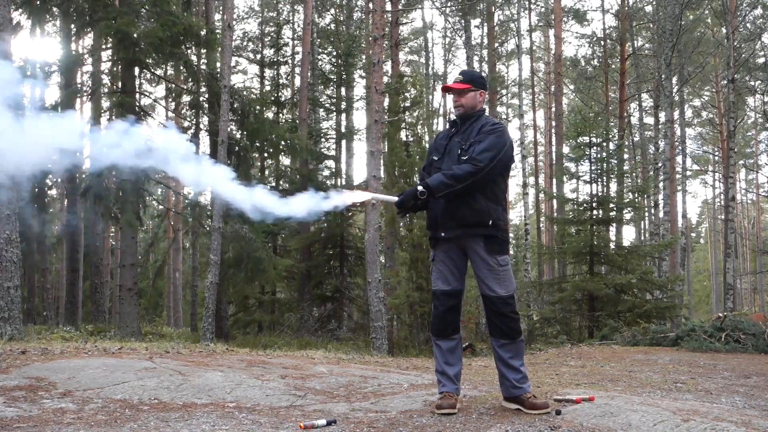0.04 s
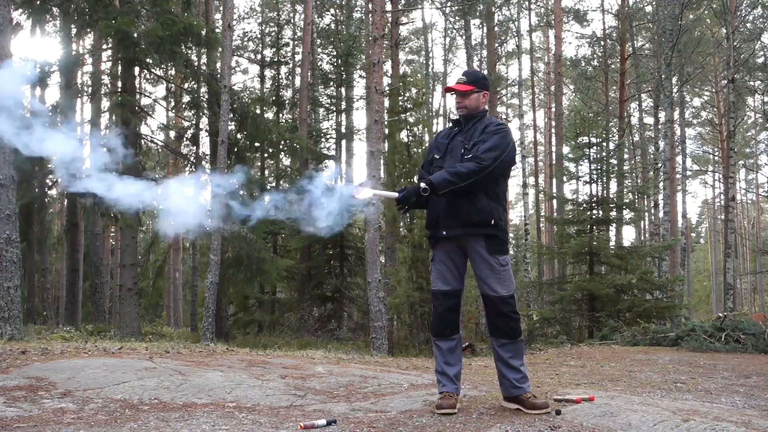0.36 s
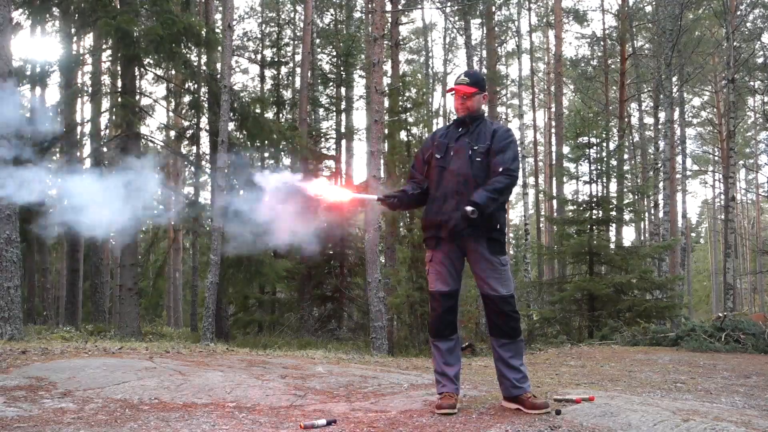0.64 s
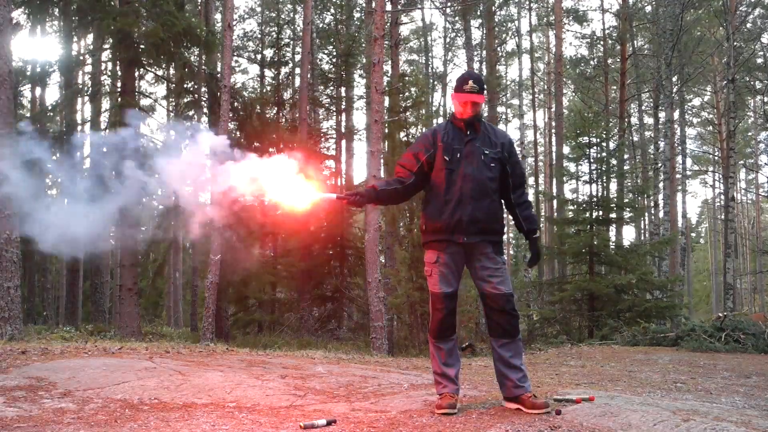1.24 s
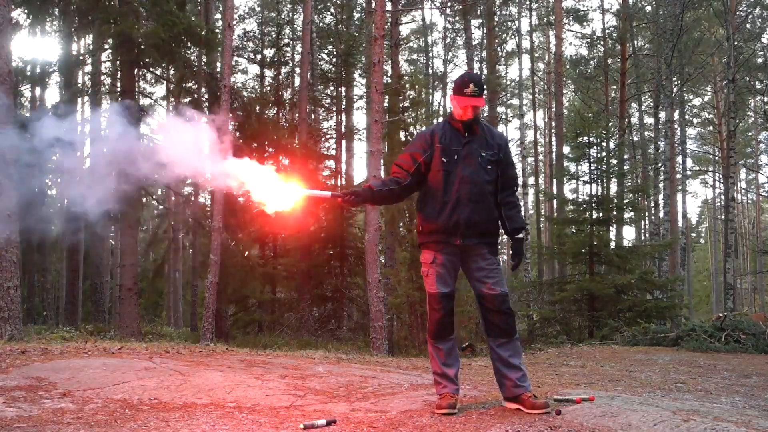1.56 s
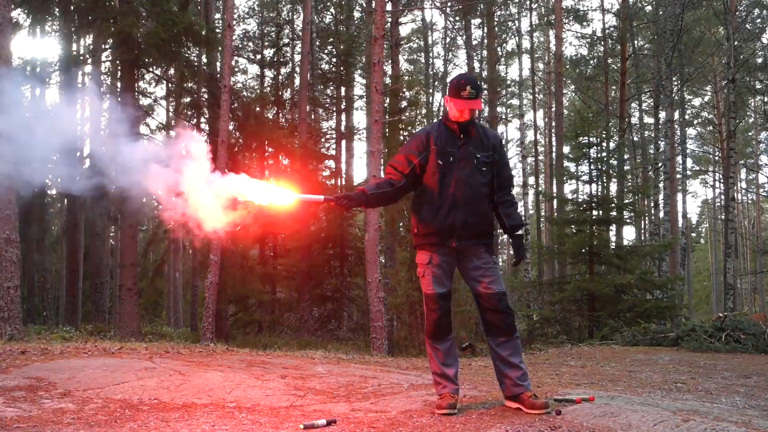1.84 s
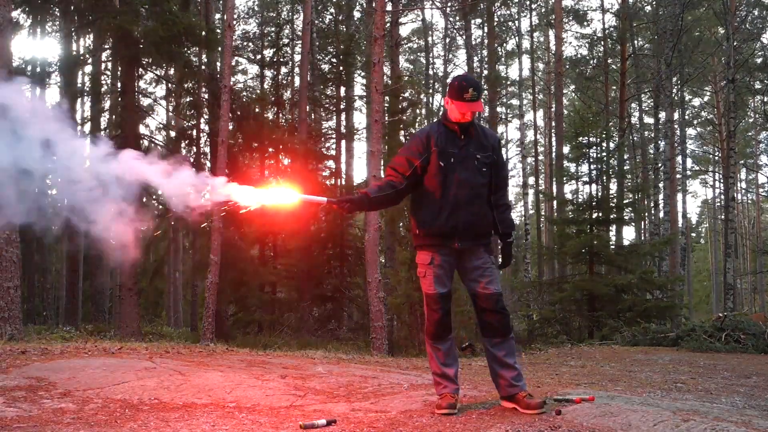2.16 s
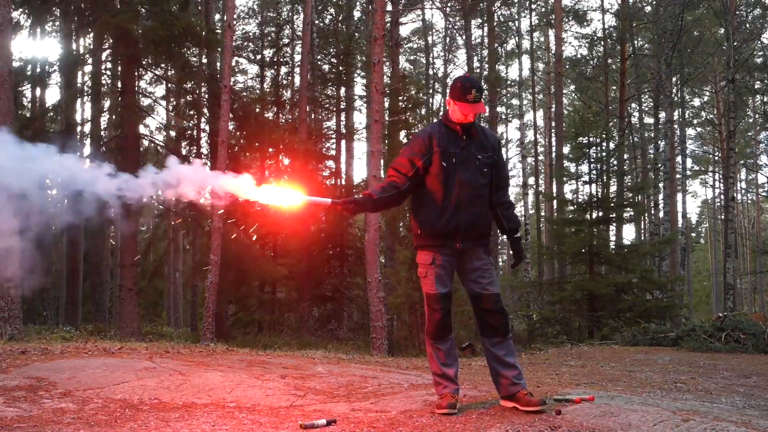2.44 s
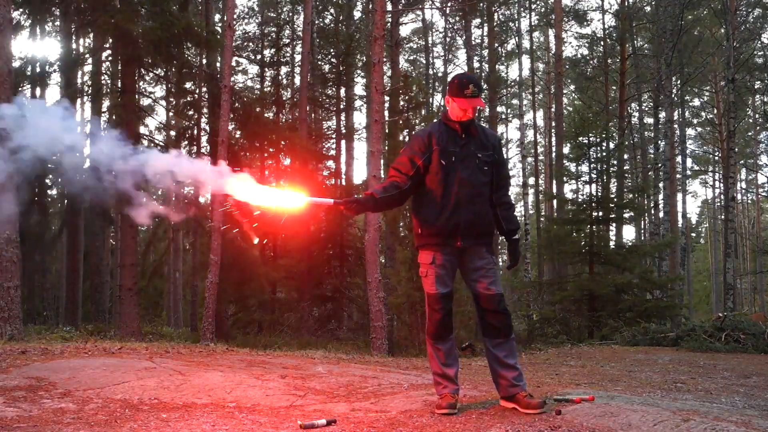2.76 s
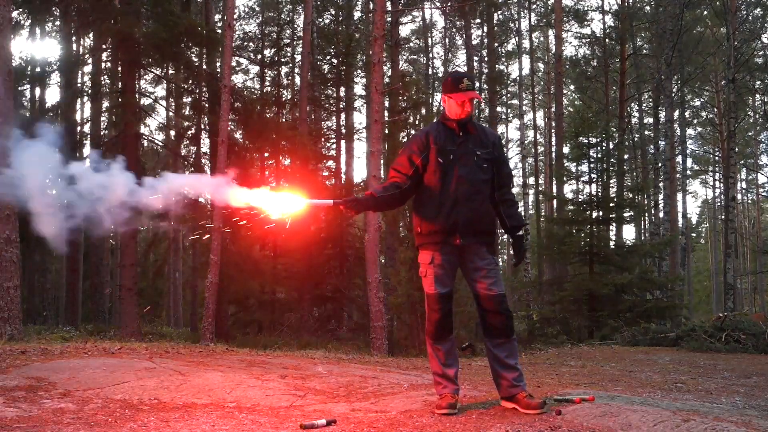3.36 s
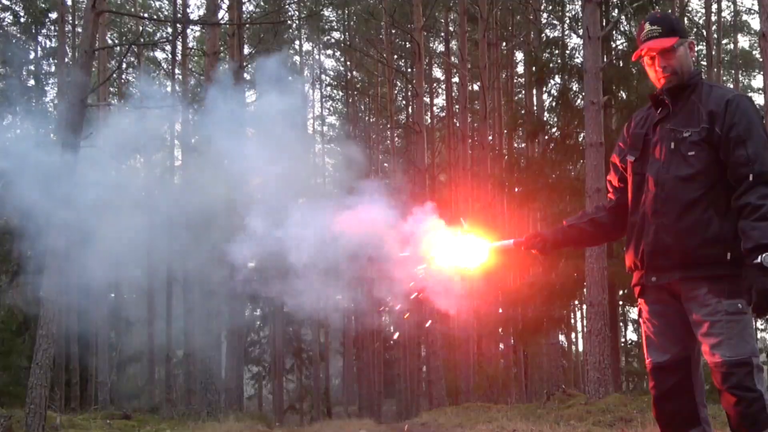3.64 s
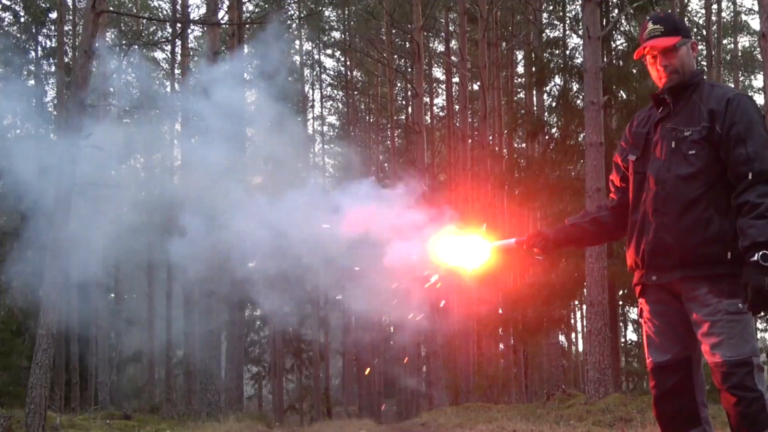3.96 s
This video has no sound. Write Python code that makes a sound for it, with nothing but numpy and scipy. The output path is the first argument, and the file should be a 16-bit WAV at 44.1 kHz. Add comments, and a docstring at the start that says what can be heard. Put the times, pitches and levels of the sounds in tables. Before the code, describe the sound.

The hiss of a burning hand flare builds from soft to a bright, sizzling rush, dotted with snaps and ticking sparks. Wind buffets the microphone throughout, and trees rustle faintly around the clearing.

```python
"""A forest clearing, where a hand flare catches and burns a few metres away.
Its gas jet hisses, roars and whistles once; slag sizzles and pops in it and sparks tick out.
The echo off the ground combs the hiss as the arm sinks. The trees scatter the sound and rustle
softly, while gusts of wind rumble, flap and slap on both microphone ports."""
import sys
import numpy as np
from scipy import signal
from scipy.fft import rfft, irfft, next_fast_len
from scipy.io import wavfile
from scipy.ndimage import map_coordinates

SR = 44100
rng = np.random.default_rng(int(sys.argv[2]) if len(sys.argv) > 2 else 0)


def int16_out(signal):
    """Quantize to a 16-bit WAV file."""
    q = np.round(np.clip(np.atleast_2d(signal).T, -1, 1) * 32767)
    wavfile.write(sys.argv[1], SR, q.astype(np.int16))


N = 176400
TIME_S = np.arange(N) / SR
SIDES = np.array([[1], [-1]])  # left, right


def amp(db):
    """Decibels to gain."""
    return 10 ** (np.asarray(db) / 20)

def unit(x):
    """Scaled to rms 1."""
    return x / np.sqrt(np.mean(x ** 2) + 1e-20)

def bell(offset, width):
    """A Gaussian bump, 1 at zero offset."""
    return np.exp(-.5 * (offset / width) ** 2)

def curve(rows):
    """An automation lane: (time_s, value) rows as one value per sample."""
    return np.interp(TIME_S, *np.transpose(rows))

def wobble(rate_hz):
    """A smooth random curve through rate_hz knots a second."""
    return map_coordinates(rng.standard_normal(4096), [TIME_S * rate_hz], mode="wrap")

def filtered(x, response):
    """x through a frequency response."""
    size = next_fast_len(N + SR // 2)
    return irfft(rfft(x, size) * response(np.fft.rfftfreq(size, 1 / SR)), size)[..., :N]

def coloured(x, eq):
    """x through an EQ of (freq_hz, gain_db) rows."""
    freq_hz, gain_db = np.transpose(eq)
    return filtered(x, lambda hz: amp(np.interp(np.log(hz + 1), np.log(freq_hz), gain_db)))

def grains(per_s, spread_db):
    """Random impulses of scattered size, rms 1."""
    size = amp(spread_db * np.clip(rng.standard_normal(N), -2, 2)) * np.sign(rng.standard_normal(N))
    return unit(size * (rng.random(N) < per_s / SR))


# Soft midrange of the rustle: freq_hz, gain_db
RUSTLE_EQ = [(100, -18), (400, -2.5), (800, 3.5), (1200, 3), (1800, -5.5), (3000, -17), (8000, -23),
             (16000, -22)]

def trees(level_db=-49.5, side_db=-6):
    """The trees rustle all around, a quiet and even bed."""
    mid, side = unit(coloured(rng.standard_normal((2, N)), RUSTLE_EQ)) * amp([[0], [side_db]])
    return amp(level_db) * (mid + SIDES * side)


# Swell and fall of the gusts: time_s, level_db
GUSTS = [(0, -32), (.15, -33), (.29, -28), (.36, -34.5), (.47, -36.5), (.57, -28.5), (.68, -33.5),
         (1, -32.5), (1.11, -28), (1.2, -34), (1.35, -35.5), (1.46, -32), (1.75, -34), (1.92, -42),
         (1.98, -23.5), (2.18, -24), (2.29, -20.5), (2.54, -26.5), (2.58, -35.5), (2.94, -37),
         (3.08, -26.5), (3.37, -28), (3.7, -32), (3.76, -35.5), (3.88, -35), (4, -56)]
# The port that the rumble leans to: time_s, left_minus_right_db
RUMBLE_PAN = [(0, -4), (.6, -3), (.9, 7.5), (1.15, -2), (1.5, 4), (1.9, -0.5), (2.4, -1.5), (2.55, 1.5),
              (3.05, 2), (3.3, -9), (3.6, -0.5), (4, -5)]
# Deep body of the wind: freq_hz, gain_db
RUMBLE_EQ = [(10, -17.5), (28, -1), (60, 2), (100, -4), (160, -9.5), (250, -21.5), (400, -41), (1000, -78)]
# Low-mid flutter of the wind: freq_hz, gain_db
FLAP_EQ = [(60, -28), (140, -1.5), (230, -1.5), (330, -5.5), (480, -16), (800, -27.5), (2000, -58)]

def wind(shared=.21, breeze_db=-31.5, flap_growth=1.54, flap_pan_db=-4.5):
    """Each port has mostly its own turbulence: a rumble, and flapping that grows faster in a gust."""
    def turbulence(eq, lump_db, rate_hz):
        common = np.sqrt(shared) * rng.standard_normal(N)
        own = np.sqrt(1 - shared) * rng.standard_normal((2, N))
        lumps = amp(lump_db * np.array([wobble(rate_hz), wobble(rate_hz)]))
        return unit(coloured(common + own, eq) * lumps)

    gust_db = curve(GUSTS)
    rumble_db = gust_db + SIDES * curve(RUMBLE_PAN) / 2
    flap_db = -44.5 + flap_growth * (gust_db - breeze_db) + SIDES * flap_pan_db / 2
    rumble = turbulence(RUMBLE_EQ, lump_db=3, rate_hz=21.77) * amp(rumble_db)
    flap = turbulence(FLAP_EQ, lump_db=4.5, rate_hz=40) * amp(flap_db)
    return rumble + flap


# Low slaps of air: peak_s, level_db, centre_hz, width_s, left_minus_right_db
EDDIES = [(0.252, -33.5, 184, 0.02, -3), (0.734, -33, 221, 0.0057, -9.5), (1.118, -29.5, 75, .02, 11),
          (1.438, -31.5, 213, 0.018, -6.5), (2.27, -21, 97.5, 0.011, -16), (2.292, -22.5, 263, 0.012, -3),
          (2.395, -27.5, 266, 0.0069, -9), (2.478, -20, 260, 0.0084, -17.5), (2.5, -28, 203, 0.0073, 1),
          (3.084, -28.5, 290, .014, -8), (3.15, -30.5, 219, 0.0042, -9.5), (3.175, -26, 49.7, 0.0093, -19),
          (3.225, -29, 180, .007, -13), (3.279, -29, 131, 0.0095, -11), (3.602, -28.5, 205, 0.0065, -9),
          (3.683, -31.5, 196, 0.0078, -2)]

def eddies(width_oct=.56):
    """Single eddies slap the ports, most of them harder on one side."""
    out = np.zeros((2, N))
    for peak_s, level_db, centre_hz, width_s, pan_db in EDDIES:
        swell = bell(TIME_S - peak_s, width_s)
        band = lambda hz: bell(np.log2((hz + 1) / centre_hz), width_oct)
        slap = filtered(rng.standard_normal((2, N)), band) * swell
        slap *= np.linalg.norm(swell) / np.linalg.norm(slap, axis=1, keepdims=True)
        out += slap * amp(level_db + SIDES * pan_db / 2)
    return out


# Tone of the scatter off the trunks: freq_hz, gain_db
SCATTER_EQ = [(300, -7.5), (1200, -25.5), (2300, -8), (4000, -4), (8000, -7), (12000, -4.5), (15000, -2)]

def trunks(x, t60_s=.25, blocks=32):
    """The trunks return a diffuse tail that keeps changing as flame and air move."""
    decay = amp(-60 * TIME_S[:SR // 3] / t60_s)
    send = coloured(x, SCATTER_EQ)
    edges = np.linspace(0, N, blocks + 1).astype(int)
    out = np.zeros((2, N + SR))
    for start, end in zip(edges, edges[1:]):
        tail = rng.standard_normal((2, len(decay))) * decay  # a fresh tail for each block
        wet = signal.fftconvolve(send[None, start:end], tail / np.linalg.norm(tail[0]), axes=1)
        out[:, start:start + wet.shape[1]] += wet
    return out[:, :N]


# Lag of the ground echo, shorter as the flare is lowered: time_s, delay_ms
ECHO_DELAY = [(0, 1.42), (.35, 1.5), (.7, 1.45), (1, 1.4), (1.3, 1.37), (1.65, 1.385), (2.05, 1.32),
              (2.6, 1.345), (3.2, 1.295), (4, 1.295)]
# Tone of the ground bounce: freq_hz, gain_db
GROUND_EQ = [(300, -4.5), (1500, -3.5), (3500, -11.5), (6000, -10.5), (9000, -19), (15000, -12)]

def clearing(x, port_lag_ms=.015, lean_left_db=.5):
    """Direct sound and ground echo reach the left port first; the trunks answer from all sides."""
    delay_samples = curve(ECHO_DELAY) * SR / 1000
    echo = map_coordinates(coloured(x, GROUND_EQ), [np.arange(N) - delay_samples])
    lead_s = SIDES * port_lag_ms / 1000 / 2
    near = filtered(x + echo, lambda hz: np.exp(2j * np.pi * hz * lead_s))
    return (near + trunks(x)) * amp(lean_left_db * SIDES)


# Bright tick of a spark: freq_hz, gain_db
SPARK_EQ = [(1000, -14), (4000, -3), (8000, 0), (12000, -3), (16000, -9)]

def sparks(burn_db, trim_db=-13.5):
    """Flying sparks tick sparsely, louder as the burn grows."""
    ticks = unit(coloured(grains(per_s=60, spread_db=2.5), SPARK_EQ))
    return ticks * amp(burn_db + trim_db)


# Crisp snap of a bursting bead: freq_hz, gain_db
POP_EQ = [(300, -31), (1500, -4), (4000, 1), (7000, 5.5), (10000, 0), (13000, -6), (16000, -23.5)]
# Loud pops of slag, before the trim: start_s, peak_db
POPS = [(.518, -17), (.59, -23), (.605, -20.5), (.666, -22), (.695, -20.5), (.772, -20), (.815, -20),
        (.838, -15.5), (.877, -20), (.932, -21), (1.016, -16.5), (1.067, -15.5), (1.362, -18), (1.396, -18),
        (1.5, -16.5), (1.541, -15), (1.603, -12), (1.678, -22), (1.951, -17), (2.249, -15), (2.402, -20),
        (2.495, -18.5), (2.568, -16), (2.577, -12.5), (2.692, -16), (2.822, -16), (2.866, -13),
        (2.919, -15.5), (3.082, -14.5), (3.223, -18), (3.446, -15), (3.728, -13)]

def slag(burn_db, crackle_db=-9.5, clump_db=4.5, pop_trim_db=.5, splinter_db=-5, splinter_s=.003):
    """Beads of slag burst, each one sharp swing of pressure: spits of crackle and some loud pops."""
    snap = lambda x: -np.imag(signal.hilbert(coloured(x, POP_EQ)))
    clumps = amp(clump_db * np.clip(wobble(rate_hz=130), -2, 2))
    beads = clumps * np.abs(grains(per_s=1400, spread_db=6))
    crackle = unit(snap(beads)) * amp(burn_db + crackle_db)
    bursts = np.zeros(N)
    for start_s, peak_db in POPS:
        peak = amp(peak_db + pop_trim_db)
        bursts[round(start_s * SR)] += peak
        splinters_s = start_s + splinter_s * rng.uniform(-1.2, 1, size=5)
        bursts[np.round(splinters_s * SR).astype(int)] += peak * amp(splinter_db)
    snap_peak = snap(signal.unit_impulse(N, "mid")).max()
    return crackle + snap(bursts) / snap_peak


def whistle(peak_s=2.53, width_s=.022, pitch_hz=3650, width_hz=70, level_db=-41):
    """The gas catches a narrow resonance of the nozzle for a moment."""
    tone = unit(filtered(rng.standard_normal(N), lambda hz: bell(hz - pitch_hz, width_hz)))
    return amp(level_db) * tone * bell(TIME_S - peak_s, width_s)


def patchy(x, depth_db=.8, patch_hz=301, patch_s=.1):
    """The colour shifts in patches: a random gain drifts over frequency and time."""
    hz, t, spectrum = signal.stft(x, SR, nperseg=512)
    grid = np.meshgrid(hz / patch_hz, t / patch_s, indexing="ij")
    drift = map_coordinates(rng.standard_normal((128, 128)), grid, mode="wrap")
    return signal.istft(spectrum * amp(depth_db * drift), nperseg=512)[1][:N]


# The burn catches, then surges; fader for hiss, rush, slag crackle and sparks: time_s, level_db
BURN = [(0, -48.5), (.1, -45.5), (.19, -50), (.3, -45), (.45, -44), (.49, -40.5), (.56, -39.5),
        (.62, -37.5), (.98, -34.5), (1.06, -32), (1.17, -31), (1.25, -34), (1.35, -30), (1.46, -34),
        (1.6, -30.7), (1.7, -33), (2.02, -33), (2.47, -32.5), (2.56, -30.5), (2.64, -33), (2.76, -31),
        (3.1, -33), (3.2, -30), (3.67, -28.5), (3.89, -30.5), (4, -29.5)]
# Roar fader, rising as the flame widens: time_s, level_db
ROAR_FADER = [(0.0, -52.5), (0.18, -56.5), (0.42, -51.5), (0.65, -42), (1.69, -40), (1.7, -40.5),
              (2.04, -38.5), (3.97, -36.5), (4.0, -37)]
# Fader for the fine fizz on top: time_s, level_db
FIZZ_FADER = [(0, -65), (.2, -70), (.44, -69), (.6, -55), (.85, -46), (1.15, -55), (1.4, -44), (1.55, -52),
              (1.9, -49), (2.3, -48), (2.57, -41), (2.8, -45), (3.1, -40), (3.5, -40.5), (3.85, -39.5),
              (4, -37)]
# Tilt from rush to hiss, brightest while the flame first grows: time_s, tilt_db
BRIGHTNESS = [(0, 1), (.55, -0.5), (.95, 6), (1.9, 2.5), (2.3, 2.5), (2.8, -1), (3.3, 2), (4, 2)]
# Broad body of the roar: freq_hz, gain_db
ROAR_EQ = [(200, 3), (450, -1.5), (750, -4.5), (1100, 0.5), (1500, -1.5), (2300, 0), (3200, -2),
           (5000, -27.5), (10000, -43)]
# Upper-mid rush of gas: freq_hz, gain_db
RUSH_EQ = [(2000, -16.5), (3200, -5), (3750, 3), (4600, 3), (5400, 0.5), (6500, -2), (9000, -37)]
# Bright edge of the hiss: freq_hz, gain_db
HISS_EQ = [(1000, -14), (3500, -11), (5300, -4), (6500, 0), (7400, -1.5), (8600, -3.5), (10500, -13),
           (13000, -18), (16000, -30)]
# Airy top of the fizz: freq_hz, gain_db
FIZZ_EQ = [(3000, -22), (8000, 6), (10500, 2.5), (12000, -0.5), (14000, -7.5), (16000, -11)]

def jet(burn_db, sputter_db=.95, surge_db=-.18, sizzle_share=.48):
    """Rushing gas with dense sizzle in it: roar, rush, hiss and fizz sputter together."""
    def layer(eq, fader_db, trim_db):
        gas = np.sqrt(1 - sizzle_share) * rng.standard_normal(N)
        sizzle = np.sqrt(sizzle_share) * grains(per_s=5000, spread_db=5.5)
        return unit(coloured(gas + sizzle, eq)) * amp(fader_db + trim_db)

    sputter = amp(sputter_db * wobble(rate_hz=70) + surge_db * wobble(rate_hz=9))
    tilt_db = curve(BRIGHTNESS)
    hiss = layer(HISS_EQ, burn_db + tilt_db / 2, trim_db=-4)
    rush = layer(RUSH_EQ, burn_db - tilt_db / 2, trim_db=-5.5)
    core = patchy(hiss + rush)
    fizz = layer(FIZZ_EQ, curve(FIZZ_FADER), trim_db=1.5)
    roar = layer(ROAR_EQ, curve(ROAR_FADER), trim_db=-1)
    return (core + fizz + roar) * sputter


def scene():
    """The flare in its clearing, over the trees and the wind on the microphone."""
    burn_db = curve(BURN)
    flare = jet(burn_db) + whistle() + slag(burn_db) + sparks(burn_db)
    return clearing(flare) + trees() + wind() + eddies()

def record(dry):
    """A brick-wall high cut takes off the very top."""
    return filtered(dry, lambda hz: hz < 15900)


dry = scene()
out = record(dry)
int16_out(out)
```